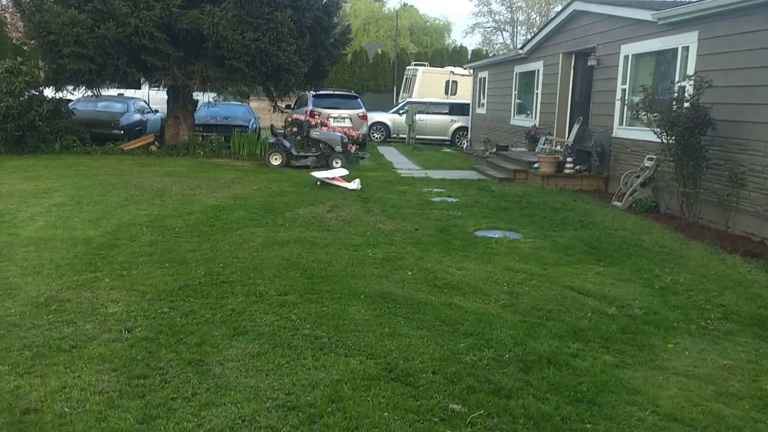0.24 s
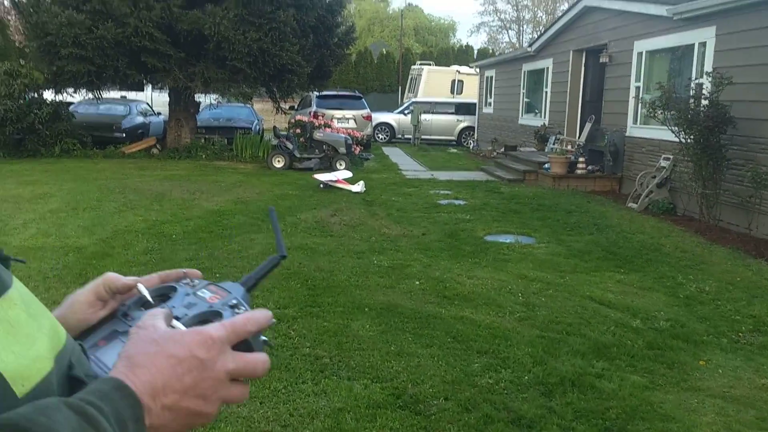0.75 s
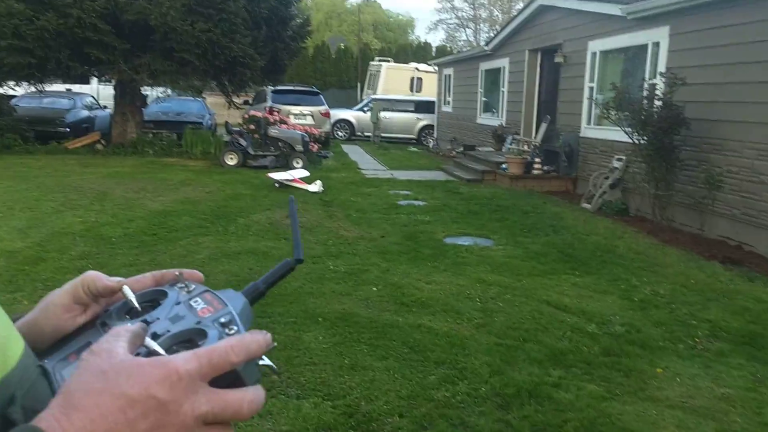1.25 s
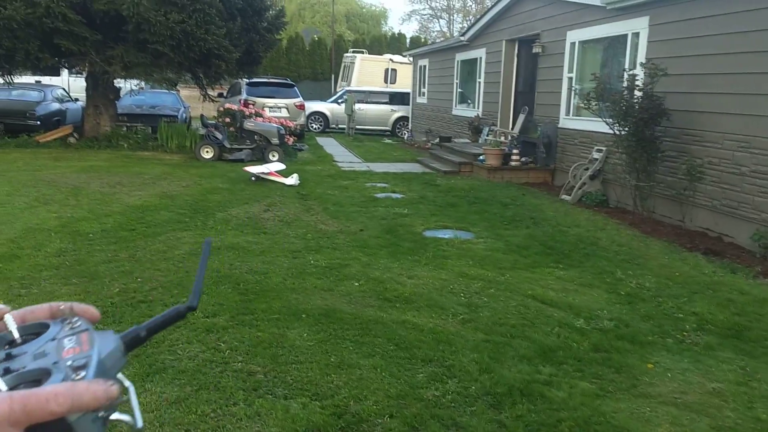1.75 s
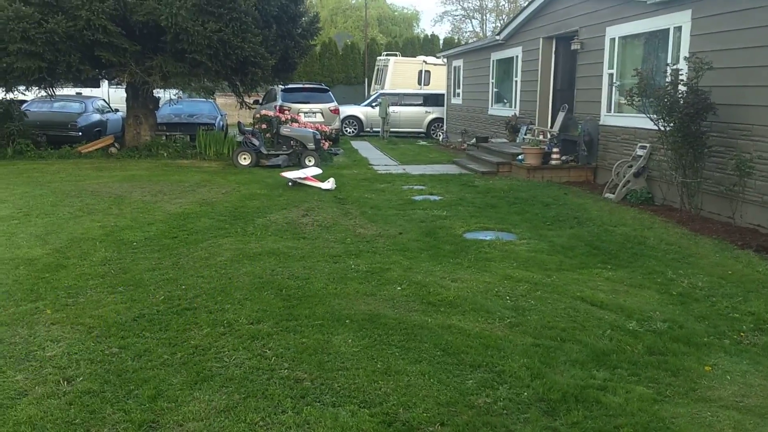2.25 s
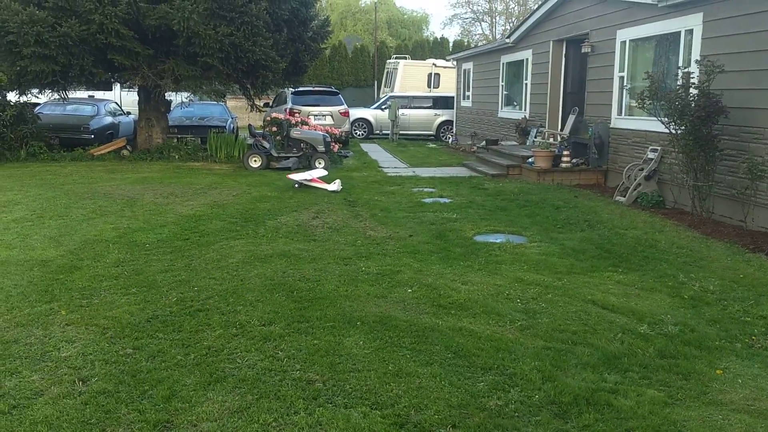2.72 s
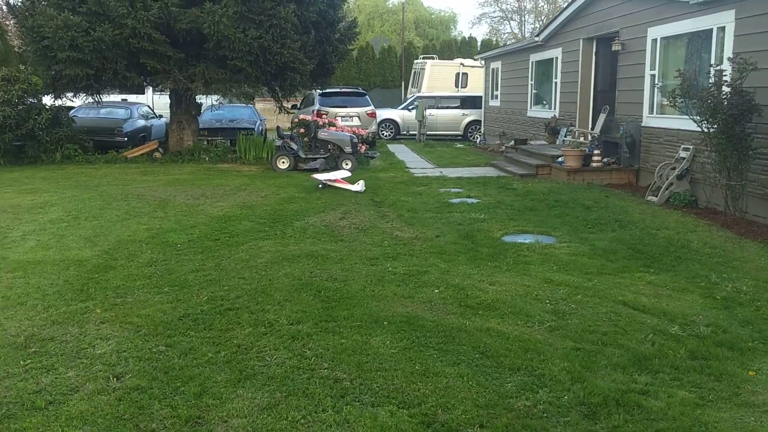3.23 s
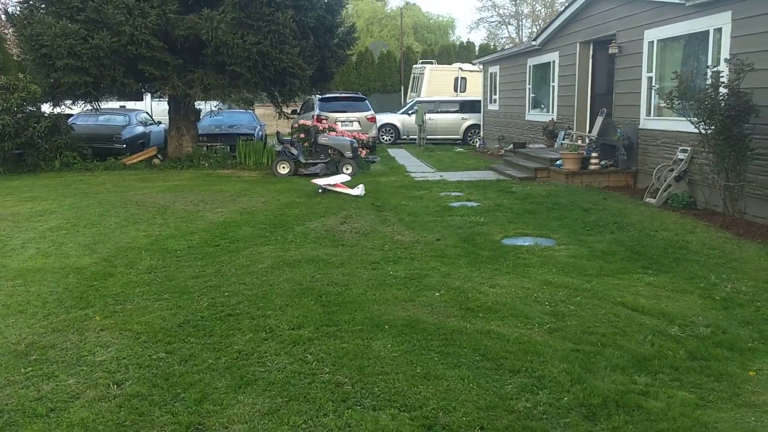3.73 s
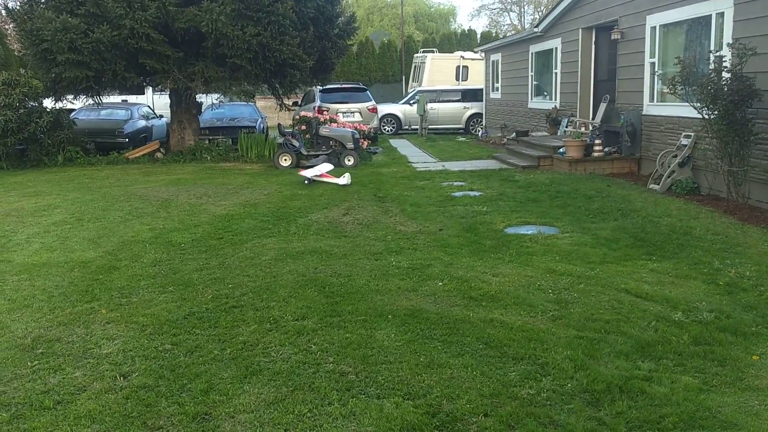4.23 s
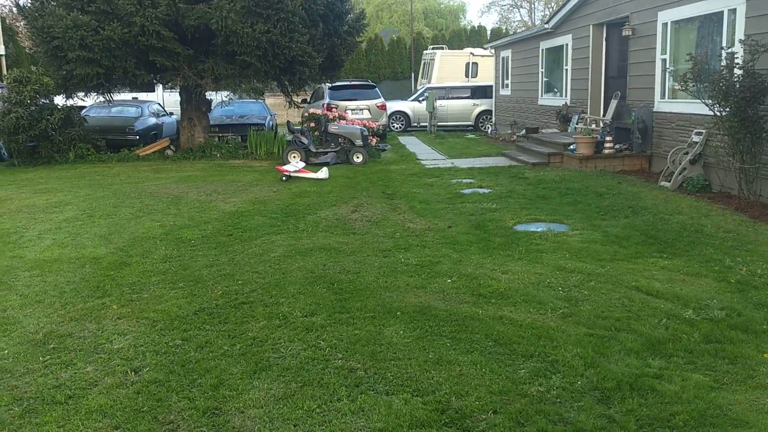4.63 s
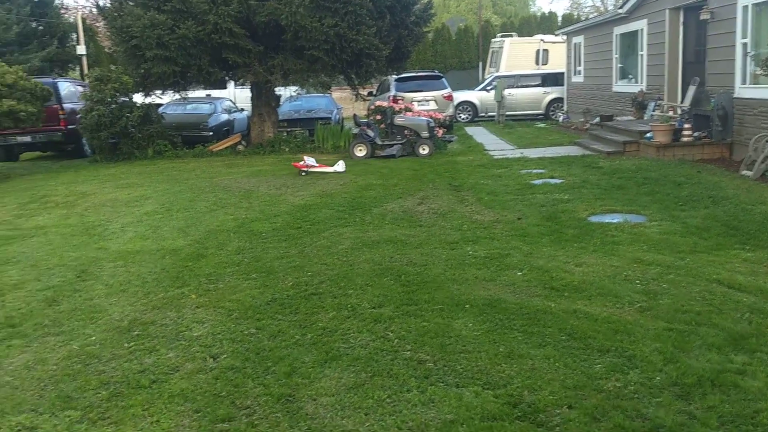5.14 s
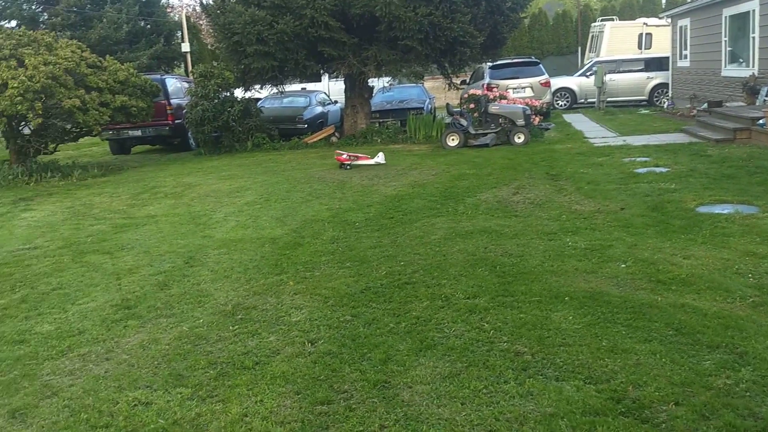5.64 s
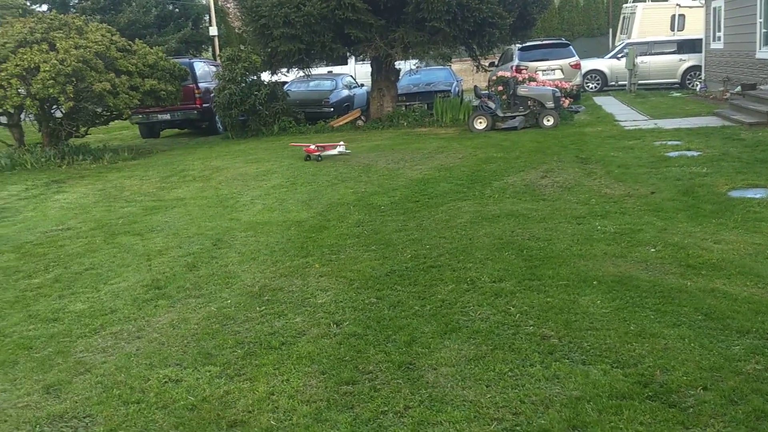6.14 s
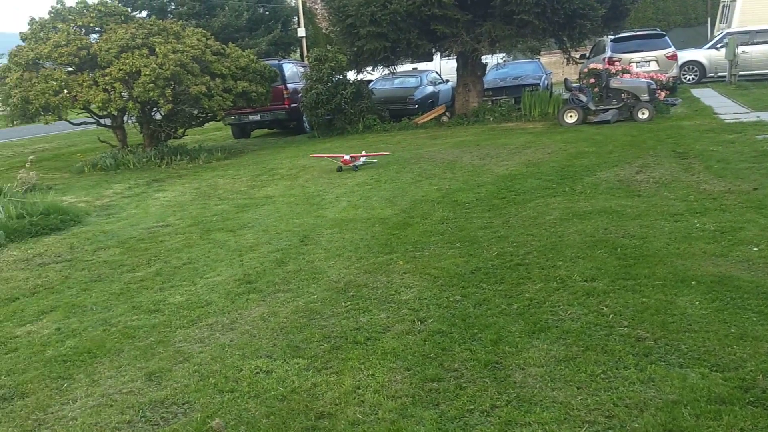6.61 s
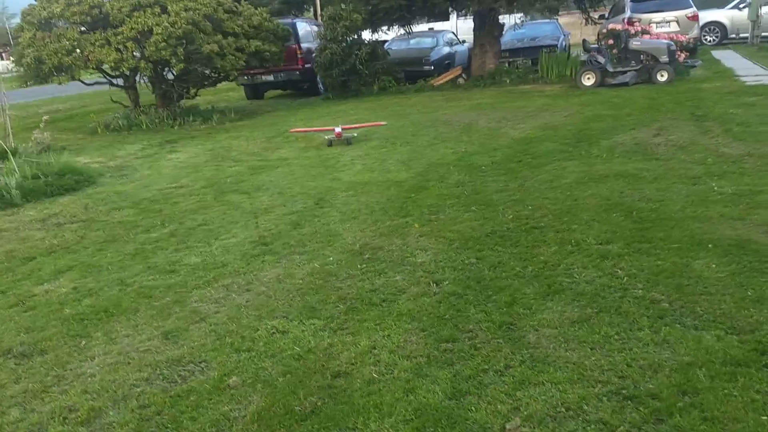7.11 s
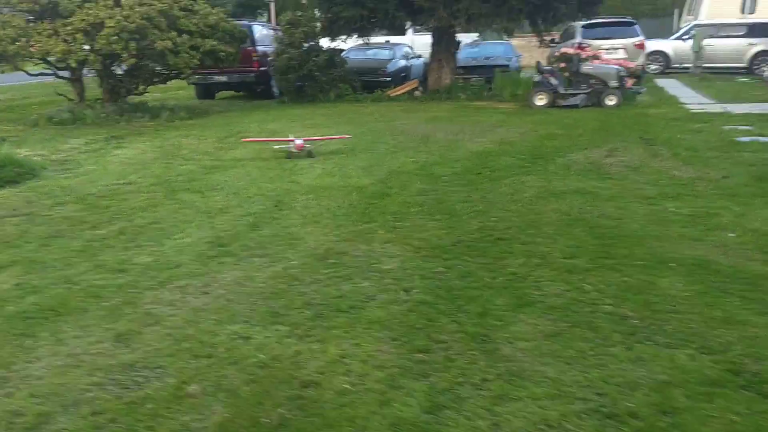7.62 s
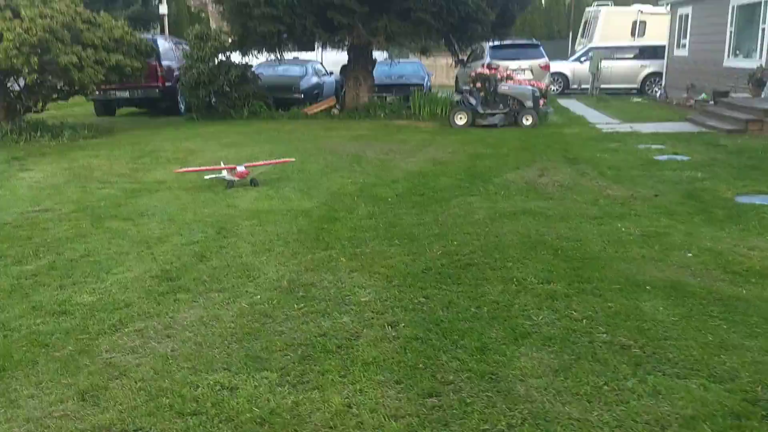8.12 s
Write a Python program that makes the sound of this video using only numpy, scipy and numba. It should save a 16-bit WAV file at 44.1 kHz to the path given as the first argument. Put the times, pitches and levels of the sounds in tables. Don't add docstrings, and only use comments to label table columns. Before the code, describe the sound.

A small electric model plane hums and buzzes across a lawn, pitch rising and sinking with throttle, with hard finger knocks close to the microphone.

```python
import sys
import numpy as np
from scipy import signal
from scipy.fft import rfft, irfft, next_fast_len
from scipy.io import wavfile
from scipy.ndimage import uniform_filter1d
from numba import njit

SR = 44100
rng = np.random.default_rng(int(sys.argv[2]) if len(sys.argv) > 2 else 0)


def put_to_file(sound):
    columns = np.atleast_2d(sound).T
    safe = np.clip(columns, -1, 1)
    whole_steps = np.round(safe * 32767)
    wavfile.write(sys.argv[1], SR, whole_steps.astype(np.int16))


def field_ratio(decibels):
    return 10 ** (np.asarray(decibels, dtype=float) / 20)


N = 369116
T, M = np.arange(N) / SR, next_fast_len(N)
F = np.maximum(np.arange(M // 2 + 1) * SR / M, 1)

# time in seconds, shaft speed in turns per second [Hz].
THROTTLE = [(0, 91.4), (.3, 91), (1.2, 93.4), (2.19, 94.95), (2.42, 101.9), (2.68, 107.1), (3.05, 101.1),
            (3.47, 99.3), (3.89, 118.5), (4.17, 122.7), (5.11, 99.9), (5.52, 100.5), (5.97, 105.8),
            (6.29, 103.5), (6.85, 87.9), (7.18, 82.6), (7.95, 81.87), (8.37, 99.1)]
# time in seconds, facing [-1 tail, 0 side, 1 nose to the camera].
HEADING = [(0, -0.87), (2.4, -1.124), (4.6, -0.87), (5.3, -0.094), (5.8, 0.39), (6.4, 0.78), (7, 0.98),
           (8.1, 0.89), (8.37, 0.63)]
CRUISE_HZ = 100
INERTIA_S = .08
HUNT_HZ, HUNT_S, HUNT_LOW_S, IDLE_UNTIL_S = 1.25, .95, .25, 2.4
PART_LEVELS = {"buzz": (-52.5, .27, 6, .2), "wing": (-54.5, .08, 3, 3.5), "cowl": (-56, .22, 10, 7),
               "hiss": (-61, .17, 11, 2.5), "tips": (-71, .15, 13, 2), "hum": (-44, .01, -13, .5),
               "magnet": (-63, .01, 3, .5), "whistle": (-55, .1, 5, -2.5), "wind": (-65, .05, .5, .3),
               "echo": (-13, .01, -8, .3), "steps": (-54, 0, 0, -4.5)}

# frequency in Hz, level in dB.
RUMBLE = [(25, -14), (50, -8), (85, -3), (130, -3), (220, -6), (350, -9), (600, -25)]
# frequency in Hz, level in dB.
GRASS_SCATTER = [(5000, -16), (9000, -11), (12000, -3), (15600, 3), (16200, -42.5)]
# peak time in seconds, peak level in dB, pitch in Hz, half length in seconds.
BIRD_CHIPS = [(4.355, -34, 3537, 0.0033), (4.68, -39, 3480, 0.0063), (5.422, -32.5, 3507, 0.0027),
              (5.955, -38, 3490, 0.0049), (6.385, -31.5, 3640, 0.0036), (6.6, -29, 2620, 0.0021),
              (6.72, -39, 3620, 0.0037)]

# start in seconds, peak level in dB, ring pitch in Hz,
# 60 dB decay in seconds, crack level in dB.
TICKS = [(0.9952, -4.5, 2530, 0.008, -35.5), (0.995, -19.5, 1087, .04, -14.5),
         (1.0078, -22, 990, 0.032, -14), (1.008, -42, 1690, 0.034, -9), (1.6553, -14, 980, 0.0055, -36),
         (7.2627, -9.5, 2100, 0.0047, -3.5), (7.6382, -14, 1290, 0.0021, -14.5),
         (7.7438, -28.5, 1710, 0.0076, -15), (7.7749, -13, 2060, 0.0051, -9.5),
         (7.7802, -24, 1910, 0.0038, 0), (7.7838, -45, 1900, .006, -13.5), (7.8017, -29, 1784, .006, -6.5),
         (7.8028, -14.5, 2035, 0.0082, -17.5), (7.8027, -23, 5840, 0.005, -8.5),
         (7.811, -30, 1800, .008, -6), (7.816, -17.5, 1880, 0.0038, -2.5), (7.8205, -2, 2040, 0.0027, -16),
         (7.864, -21.5, 365, 0.04, -40), (7.844, -20, 1190, 0.0023, -5.5),
         (7.861, -16.5, 730, 0.0066, -28.5), (8.139, -20.5, 905, 0.0028, -25.5)]
# crest time in seconds, peak level in dB, pitch in Hz,
# half length in seconds.
THUMPS = [(.12, -38, 350, 0.003), (.56, -48, 307, 0.006), (.72, -39, 300.8, 0.0063),
          (.997, -8, 405, 0.0014), (1.003, -21, 137, 0.0071), (1.0086, 3.5, 520, 0.00034),
          (1.0125, -30.5, 245, 0.0024), (1.41, -50, 300, 0.0022), (1.4465, -34, 224.5, 0.0018),
          (1.6565, -31, 620, 0.00069), (1.66, -47, 235, 0.0081), (3.63, -32, 199.8, 0.0023),
          (6.195, -32.5, 260.7, .005), (7.243, -35.5, 276, 0.0055), (7.362, -34.5, 253.5, 0.0029),
          (7.385, -40, 232, 0.0048), (7.491, -36, 278, 0.0025), (7.522, -45, 353.7, 0.0025),
          (7.536, -26, 300, 0.0014), (7.558, -29, 455.4, 0.00051), (7.64, -22, 513, 0.00065),
          (7.812, -31, 252, 0.0045), (7.8458, -17, 149, 0.0016), (7.853, -27.5, 150, 0.0021),
          (7.96, -53, 301.7, .004), (8.143, -25, 411, 0.003), (8.21, -45, 299, .003)]
# middle in seconds, half length in seconds, level in dB,
# centre in Hz, width in octaves.
RUSTLES = [
    (0.954, 0.018, -37.5, 280, 2.3),
    (0.956, 0.019, -34, 2500, 3.7),
    (.12, 0.039, -47.5, 290, 3),
    (0.86, 0.15, -46.5, 1200, 3.9),
    (7.141, 0.045, -45, 900, 3),
    (7.61, 0.02, -49, 640, 3),
    (7.721, .022, -48, 700, 3),
    (7.5, 0.035, -49, 600, 3),
    (9.5, 0.043, -55.5, 290, 1.87),
    (8.352, .02, -46, 410, 4.1),
]
GRIP_S = 3

# frequency in Hz, level in dB.
SHAKE = [(300, -3), (480, -12), (780, -8), (950, 0), (1300, 0), (1550, -6), (2300, -1), (3100, -1),
         (3600, -6), (7000, -6)]
# time in seconds, level in dB.
SHAKE_FADE = [(0, -4), (1, -3), (2.3, -2), (6.3, -2), (6.9, -7), (8, -7), (8.37, -3)]
# frequency in Hz, level in dB.
BUZZ = [(2000, -28.5), (2300, 3), (2500, 7.5), (2800, 0.5), (3100, -7), (3400, -31)]
# frequency in Hz, level in dB.
WING = [(250, 1.5), (400, -4), (650, -1.5), (1000, -2), (1400, -9), (1900, 3.5), (2300, -12), (2600, -24.5)]
# frequency in Hz, level in dB.
COWL = [(2800, -24), (3300, 1.5), (3800, 2), (4500, 1.5), (5500, -5), (6500, -12), (7600, -19.5),
        (8500, -13)]
# frequency in Hz, level in dB.
HISS = [(5000, -1), (7000, 5.5), (8500, 4), (9800, 2), (12000, 6.5), (14000, 3), (15600, 7), (15900, -12.5),
        (16400, -43)]

# multiple of shaft speed, level in dB.
MAGNET = [(13, -9), (14, -5), (15, -17), (28, -23)]
# shaft speed in Hz, level in dB.
WHINE = [(80, 11), (86, 6.5), (92, -3), (100, 0.5), (106, 5.5), (112, 18.5), (122, 23)]
WHINE_LAG_S = .2
# shaft speed in Hz, level in dB.
COMMUTE = [(82, -1), (86, -7), (90, -4), (94, -10), (100, -3), (106, 8), (114, 6), (122, 3)]
LOAD_DB, LOAD_HZ_PER_S = 2.5, 15
# time in seconds, pitch in Hz.
SWITCH_HZ = [(0, 7829), (1, 7821), (2, 7814), (3, 7811), (5.2, 7810), (5.8, 7815), (6.3, 7838),
             (6.75, 7856), (7.3, 7853), (8.37, 7847)]
# offset in shaft multiples, level in dB.
SIDEBANDS = [(-5, -22), (-4, -19), (-3, -22), (-2, -15), (-1, -14), (1, -16), (2, -14), (3, -24), (4, -19)]
# time in seconds, level in dB.
WHISTLE_BEAM = [(0, 0.5), (.58, -4.5), (.72, 9.5), (.95, -6), (2.1, 1), (2.5, -5), (3.2, 4.5), (3.8, -3.5),
                (4.4, -1), (4.95, -4), (5.15, 3), (5.6, -4), (6.2, -0.5), (6.6, 4.5), (7.2, -3.5),
                (7.65, -6), (8.1, 4), (8.37, -1)]
# shaft multiple, switching multiple,
# middle in seconds, half length in seconds, level in dB.
BEATS = [
    (-42, 1, 5.45, .5, -55),
    (84, -1, 3.8, .09, -46),
    (84, -1, 4.5, .08, -50),
    (168, -2, 6, .17, -52),
]

# multiple of shaft speed, cruise level in dB.
BLADE = [(1, -27), (2, 2), (3, -12.5), (4, -17), (8, -12), (9, -15), (10, -10), (12, -31), (26, 4)]
BLADE_DB_PER_HZ = 0.3671
# shaft speed in Hz, level in dB.
HUM = [(80, -13), (90, -11), (94, -6), (100, -1.1), (106, -3), (114, -4.5), (121, 5.5)]

# time in seconds, dip in dB, recovery in seconds.
DUCKS = [
    (1.009, -25, 0.67),
    (7.266, -3, 0.2),
    (7.822, -12.5, 0.41),
]
# time in seconds, dip in dB, recovery in seconds.
PUNCH = [
    (.998, -6, .012),
    (1.011, -8, .015),
    (7.264, -3, .015),
    (7.823, -10, .025),
]
# frequency in Hz, level in dB.
NARROW = [(30, -3), (500, 2), (800, -1.5), (1300, -3), (1900, -3), (2300, -6.5), (2900, -9.5), (3600, -1),
          (20000, 2.5)]
LATE = np.exp(-2j * np.pi * F * 20.2 / SR)


def unit(x):
    return x / np.sqrt(np.mean(x ** 2))


def curve(x, points):
    return np.interp(x, *np.transpose(points))


def response(points):
    hz, db = np.transpose(points)
    return field_ratio(np.interp(np.log(F), np.log(hz), db, left=-70, right=-70))


def through(x, gain):
    return irfft(rfft(x, M) * gain, M)[:N]


def colour(x, points):
    return unit(through(x, response(points)))


def walk(rate):
    steps = rng.standard_normal(int(N / SR * 60) + 3)
    return np.interp(T * rate, np.arange(len(steps)), steps) * 1.1


def line(turns, db):
    return np.sqrt(2) * field_ratio(db) * np.sin(2 * np.pi * (turns + rng.random()))


def dips(rows):
    return field_ratio(sum(db * (T > s) * np.exp(-np.maximum(T - s, 0) / back) for s, db, back in rows))


def loudness(part, hz, facing):
    db, db_per_hz, nose_db, tail_db = PART_LEVELS[part]
    return db + db_per_hz * (hz - CRUISE_HZ) + np.where(facing > 0, nose_db, tail_db) * facing ** 2


def wind(wind_db):
    gust_db = wind_db + 2 * walk(4)
    ports = []
    for port_db in (-.5, 6):
        level = field_ratio(gust_db + port_db + 2.7 * walk(2))
        ports.append(dips(DUCKS) * level * colour(rng.standard_normal(N), RUMBLE))
    return ports


def tree_echo(plane, echo_db):
    trees = rng.standard_normal(6000) * np.exp(-T[:6000] / 0.056)
    return field_ratio(echo_db) * signal.fftconvolve(plane, trees / np.linalg.norm(trees))[:N]


def grass_hiss(tips_db):
    return [dips(DUCKS) * field_ratio(tips_db) * colour(rng.standard_normal(N), GRASS_SCATTER) for side in range(2)]


def puffs(rows, fall):
    out = np.zeros(N)
    for s, db, hz, half in rows:
        part = slice(max(int((s - 3 * half) * SR), 0), int((s + 5 * half) * SR))
        t = T[part] - s
        shape = np.exp(-(t / (half * np.where(t < 0, .7, 1.3))) ** 2)
        out[part] += field_ratio(db) * shape * np.cos(2 * np.pi * hz * t * (1 - fall * np.tanh(t / half)))
    return out


def bird():
    return puffs(BIRD_CHIPS, fall=0.0046)


def rustles():
    out, size = np.zeros(N), 2 ** 16
    f = np.maximum(np.arange(size // 2 + 1) * SR / size, 1)
    for s, half, db, hz, octaves in RUSTLES:
        part = slice(max(int((s - 3 * half) * SR), 0), min(int((s + 3 * half) * SR), N))
        t = T[part] - s
        roughness = np.repeat(field_ratio(2.5 * rng.standard_normal(size // 128)), 128)
        grain = rng.standard_normal(size) * roughness
        band = unit(irfft(rfft(grain) * np.exp(-(2 * np.log2(f / hz) / octaves) ** 2)))
        out[part] += field_ratio(db) * np.exp(-(t / half) ** 2) * band[:len(t)]
    return out


def ticks():
    out, t = np.zeros(N), T[:3000]
    for s, db, hz, t60, crack_db in TICKS:
        ring = -np.sin(2 * np.pi * hz * t) * 1000 ** (-t / t60)
        snap = np.cos(2 * np.pi * 12000 * t) + .3 * rng.standard_normal(len(t))
        crack = field_ratio(crack_db) * snap * np.exp(-t / 0.00005)
        start = int(s * SR)
        out[start:start + len(t)] += field_ratio(db) * (ring + crack)
    return out


def hand():
    touch = ticks() + puffs(THUMPS, fall=0.3) + rustles()
    return signal.sosfilt(signal.butter(1, 170, "high", fs=SR, output="sos"), touch)


@njit
def stack(turns, place, gains, starts):
    out = np.zeros(len(turns))
    for i in range(len(turns)):
        step, z, j = np.exp(2j * np.pi * turns[i]), 1 + 0j, int(place[i])
        part = place[i] - j
        for k in range(len(starts)):
            z *= step
            out[i] += (z * starts[k]).real * (gains[j, k] + part * (gains[j + 1, k] - gains[j, k]))
    return out


def shake(turns, flutter_db, rate):
    depth_db = flutter_db * np.minimum(.4 + np.arange(64) / 30, 1)
    gains = field_ratio(depth_db * rng.standard_normal((int(N / SR * rate) + 3, 64)))
    starts = np.exp(2j * np.pi * rng.random(64))
    return unit(stack(turns, T * rate, gains, starts))


def airframe(turns, buzz_db, wing_db, cowl_db, hiss_db):
    drive = shake(turns + .008 * walk(30), flutter_db=4, rate=18)
    drive = colour(drive, SHAKE) * field_ratio(curve(T, SHAKE_FADE))
    chop = 1 + .35 * np.cos(2 * np.pi * turns) + .3 * np.cos(4 * np.pi * turns)
    jolt_db = 1.1 * walk(40)
    # colour, level in dB, turbulence in dB.
    parts = [(BUZZ, buzz_db + 8.0, -3.1), (WING, wing_db + 2.3, 1.5), (COWL, cowl_db + 3.5, 3.1)]
    out = np.zeros(N)
    for part, db, air_db in parts:
        push = drive + field_ratio(air_db) * chop * rng.standard_normal(N)
        out += field_ratio(db + jolt_db + 0.53 * walk(10)) * colour(push, part)
    air = rng.standard_normal(N) * (1 + 0.13 * np.cos(4 * np.pi * turns))
    return out + field_ratio(hiss_db + 2.5 + 0.69 * jolt_db) * colour(air, HISS)


def motor(turns, magnet_db, whistle_db, steps_db):
    switch = np.cumsum(curve(T, SWITCH_HZ)) / SR
    out = line(42 * turns, steps_db + 3.5 * walk(30) + 1.5 * walk(6) + 1)
    out += line(switch, whistle_db + 2.0 + 2.6 * walk(50))
    for k, db in MAGNET:
        out += line(k * turns, magnet_db + db + 3.3 * walk(8.4))
    for k, db in SIDEBANDS:
        out += line(switch + k * turns, whistle_db + db + 4 * walk(4.5))
    for k, j, s, half, db in BEATS:
        out += line(k * turns + j * switch, db + 2 * walk(15)) * np.exp(-((T - s) / half) ** 2)
    return out


def propeller(hz, turns, hum_db):
    tilt = {1: BLADE_DB_PER_HZ, 3: BLADE_DB_PER_HZ, 8: -2.2, 9: -.6, 10: -1.1, 12: -1.2, 26: -1.6}
    out = np.zeros(N)
    for k, db in BLADE:
        level_db = hum_db + db + tilt.get(k, 0) * (np.clip(hz, 92, 125) - 95)
        if 7 < k < 20:
            level_db = level_db - 4.5 * np.clip(94 - hz, 0, 4)
        if k != 2:
            level_db = level_db + 2 * walk(12)
        out += line(k * turns, level_db)
    return out


def from_right(x):
    bass = 1 / (1 + (F / 700) ** 3)
    early_bass = bass * field_ratio(-0.5) * np.exp(-2j * np.pi * F * .0001)
    late_treble = (1 - bass) * field_ratio(-3.1) * LATE
    return np.array([through(x, early_bass - late_treble), x])


def from_left(x):
    return np.array([-field_ratio(2.0) * x, through(x, LATE)])


def deeper_cancel(plane, facing):
    band = LATE / (1 + (900 / F) ** 4) / (1 + (F / 4500) ** 4)
    late = field_ratio(-14) * (.5 + .5 * np.maximum(facing, 0) ** 2) * through(plane, band)
    return late * [[1], [0]]


def scene():
    facing = curve(T, HEADING)
    hz = uniform_filter1d(curve(T, THROTTLE), int(INERTIA_S * SR), mode="nearest")
    idling = np.clip((IDLE_UNTIL_S - T) / .2, 0, 1)
    hz -= HUNT_HZ * np.cos(2 * np.pi * (T - HUNT_LOW_S) / HUNT_S) * idling
    turns = np.cumsum(hz) / SR
    db = {part: loudness(part, hz, facing) for part in PART_LEVELS}

    gathering = uniform_filter1d(np.gradient(hz) * SR, SR // 5)
    load_db = LOAD_DB * np.tanh(gathering / LOAD_HZ_PER_S)
    held_hz = np.maximum(hz, np.interp(T - WHINE_LAG_S, T, hz))
    magnet_db = db["magnet"] + curve(held_hz, WHINE) + 0.7 * walk(4)
    whistle_db = db["whistle"] + curve(T, WHISTLE_BEAM) + 1.6 * walk(5)
    steps_db = db["steps"] + curve(hz, COMMUTE) + load_db

    plane = airframe(turns, db["buzz"], db["wing"], db["cowl"], db["hiss"])
    plane += motor(turns, magnet_db, whistle_db, steps_db)
    plane += propeller(hz, turns, db["hum"] + curve(hz, HUM))
    plane = plane * dips(PUNCH + DUCKS)

    rumble, touch = wind(db["wind"]), hand()
    right = plane + bird() + rumble[0] + touch * (T < GRIP_S)
    left = tree_echo(plane, db["echo"]) + rumble[1] + touch * (T >= GRIP_S)
    return from_right(right) - deeper_cancel(plane, facing) + grass_hiss(db["tips"]) + from_left(left)


def band_limit(x):
    return signal.sosfilt(signal.butter(12, 17320, fs=SR, output="sos"), x)


def record(dry):
    left, right = signal.sosfilt(signal.butter(2, 90, "high", fs=SR, output="sos"), dry)
    mid = (left + right) / 2
    side = through((left - right) / 2, response(NARROW))
    mix = np.clip(np.array([mid + side, mid - side]) * field_ratio(0.78), -1, 1)
    return band_limit(mix)


dry = scene()
out = record(dry)
put_to_file(out)
```